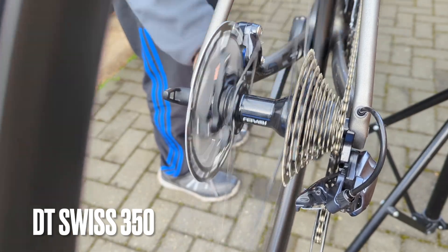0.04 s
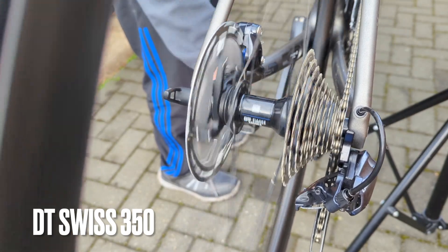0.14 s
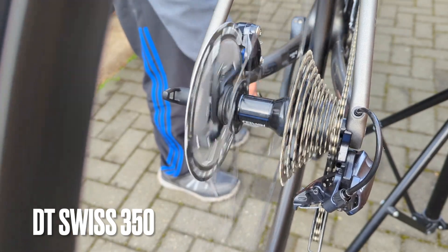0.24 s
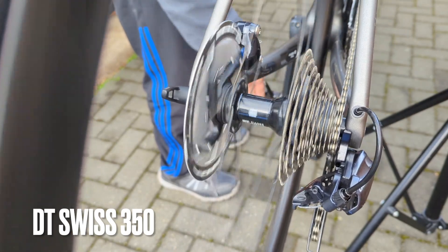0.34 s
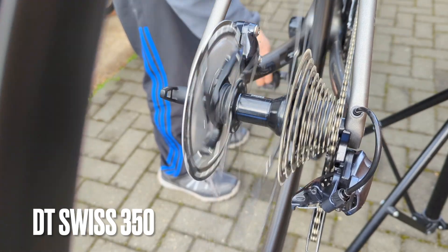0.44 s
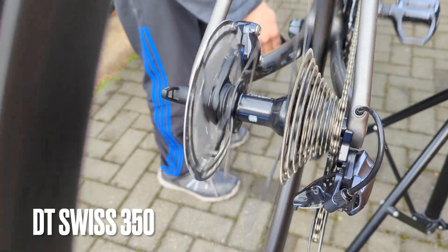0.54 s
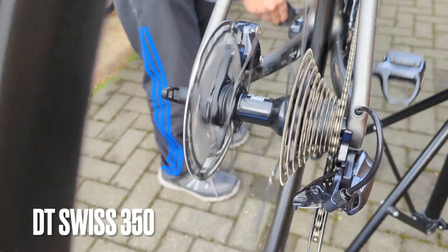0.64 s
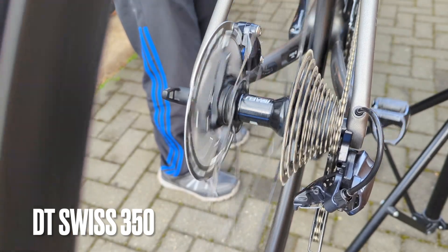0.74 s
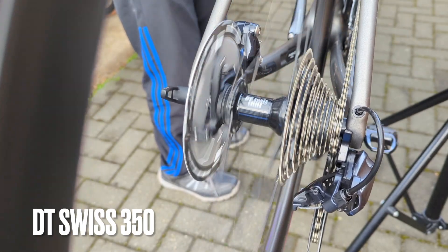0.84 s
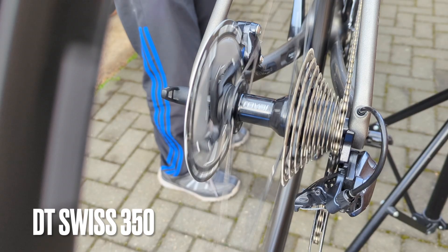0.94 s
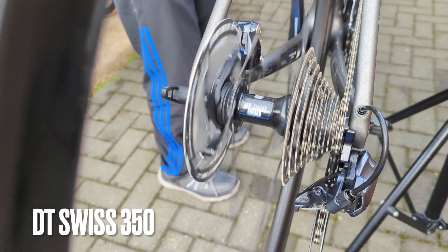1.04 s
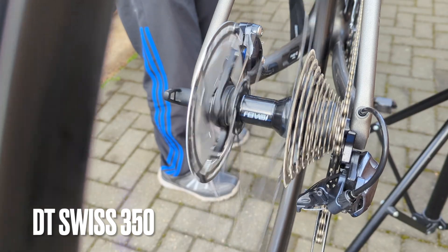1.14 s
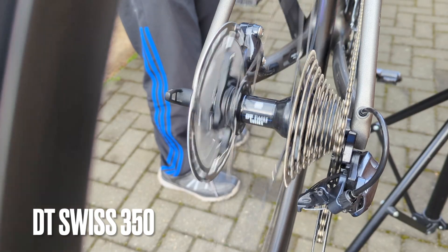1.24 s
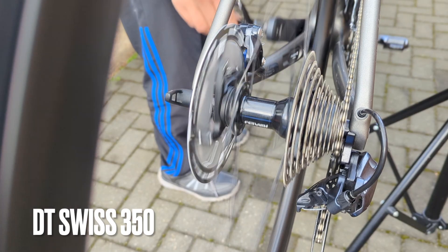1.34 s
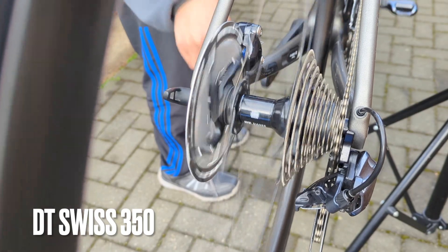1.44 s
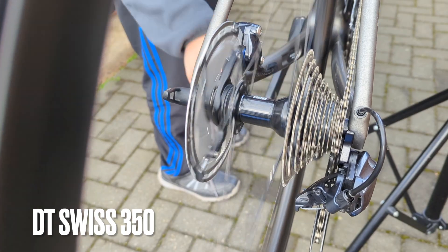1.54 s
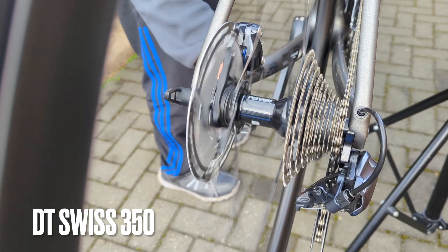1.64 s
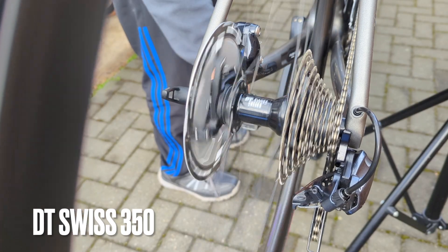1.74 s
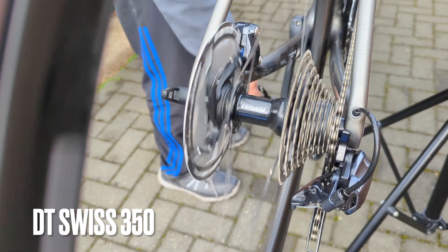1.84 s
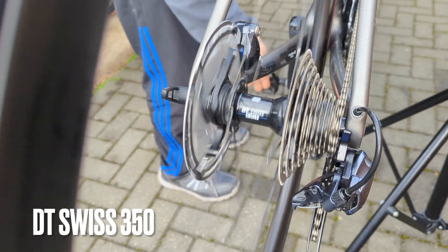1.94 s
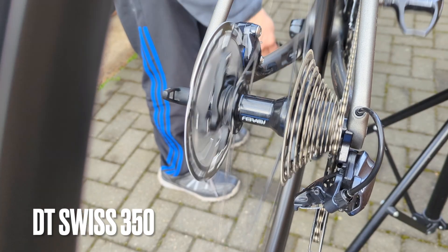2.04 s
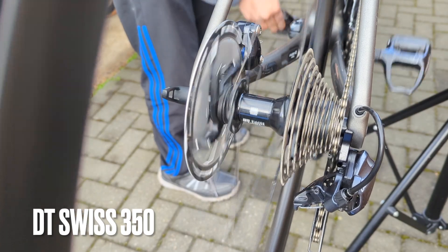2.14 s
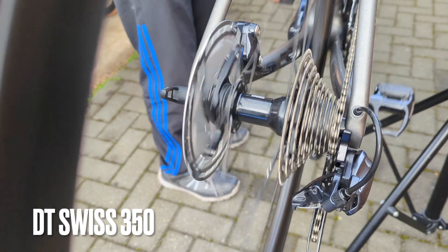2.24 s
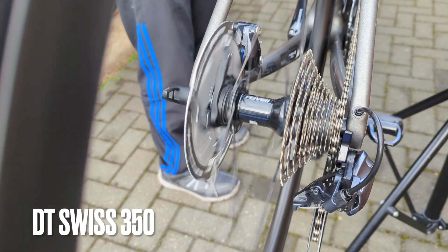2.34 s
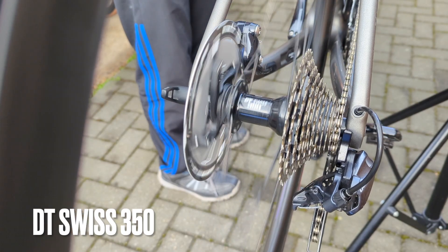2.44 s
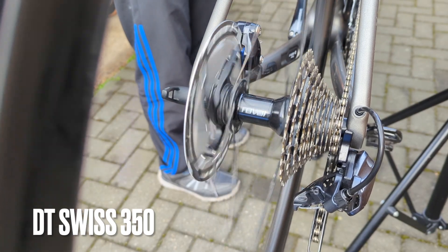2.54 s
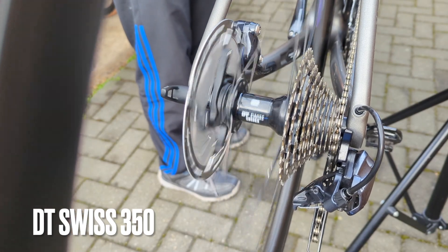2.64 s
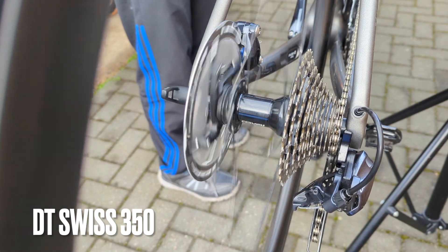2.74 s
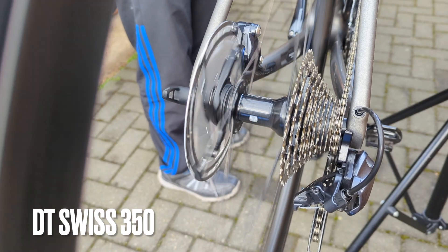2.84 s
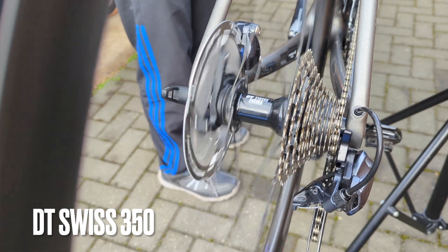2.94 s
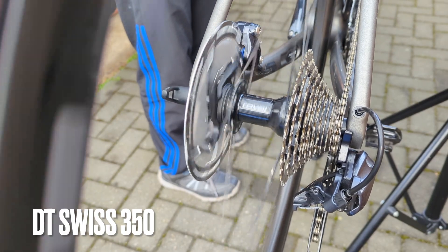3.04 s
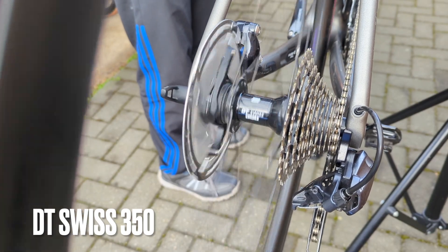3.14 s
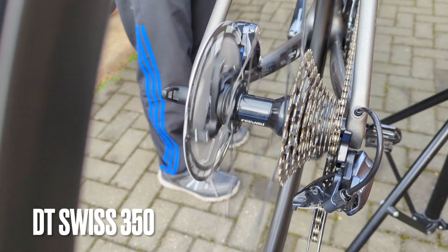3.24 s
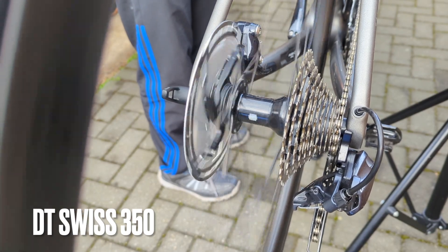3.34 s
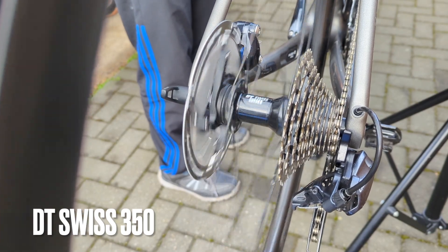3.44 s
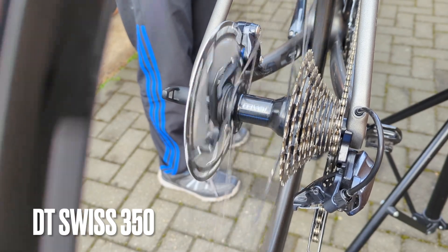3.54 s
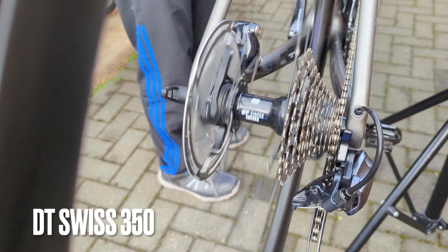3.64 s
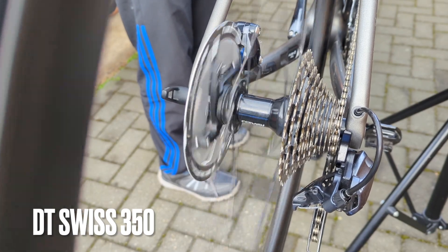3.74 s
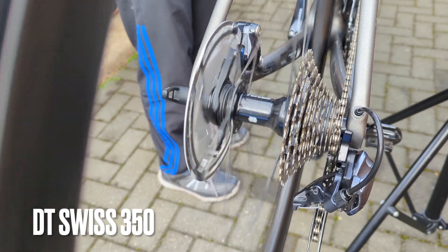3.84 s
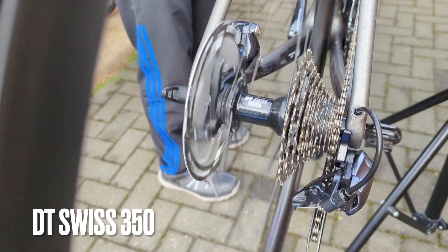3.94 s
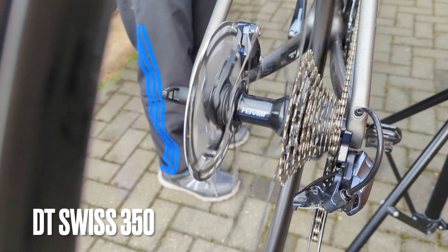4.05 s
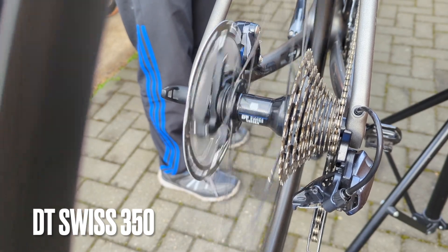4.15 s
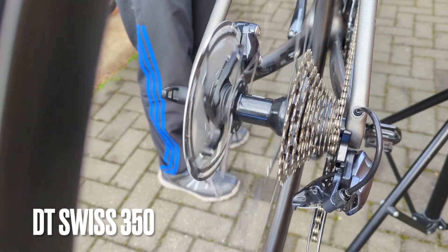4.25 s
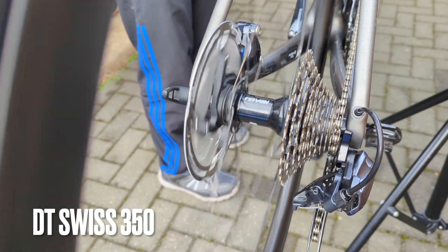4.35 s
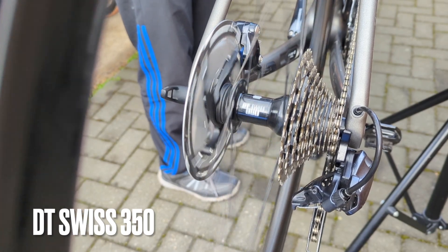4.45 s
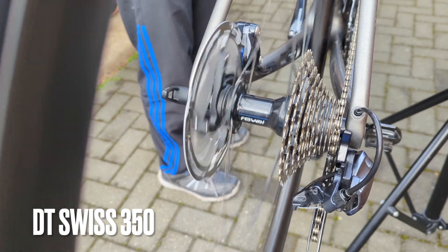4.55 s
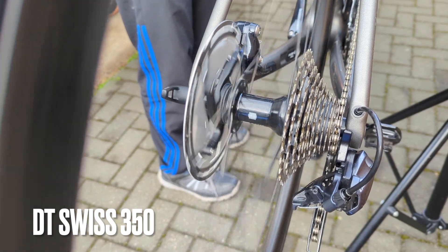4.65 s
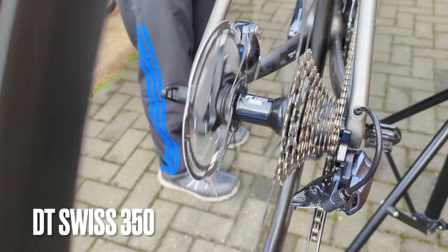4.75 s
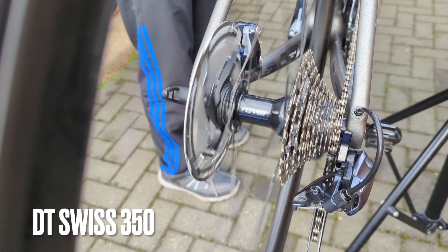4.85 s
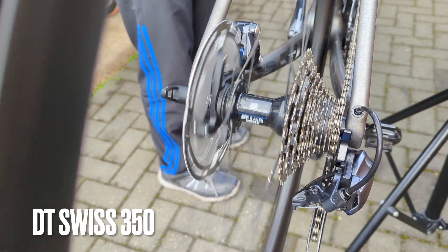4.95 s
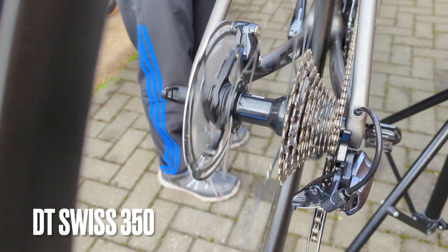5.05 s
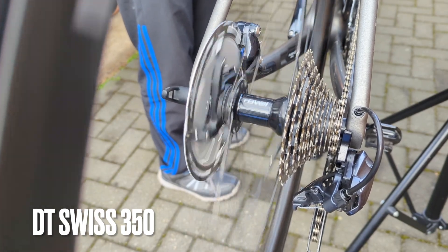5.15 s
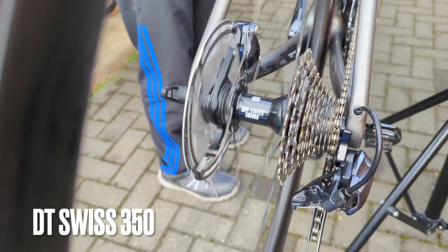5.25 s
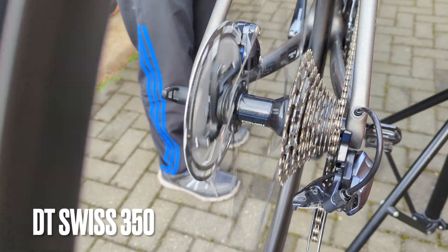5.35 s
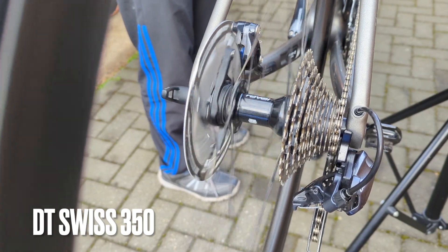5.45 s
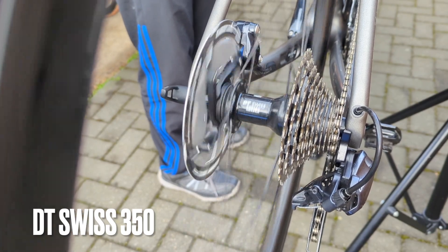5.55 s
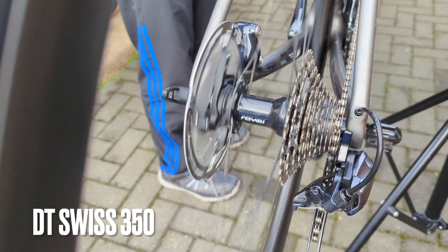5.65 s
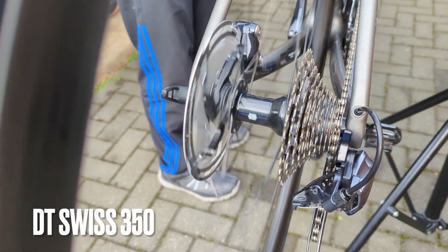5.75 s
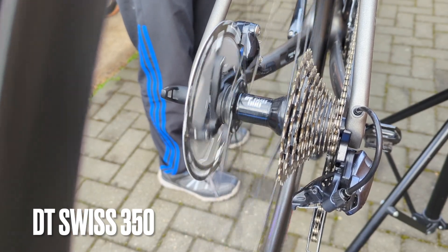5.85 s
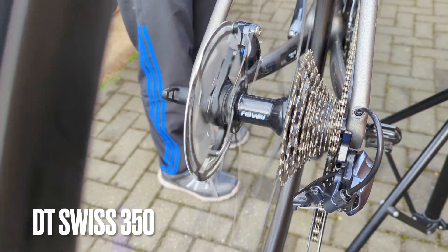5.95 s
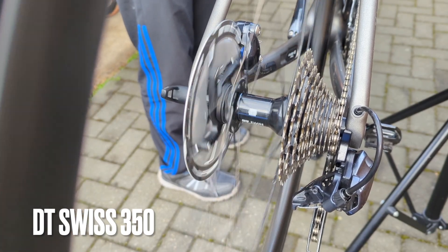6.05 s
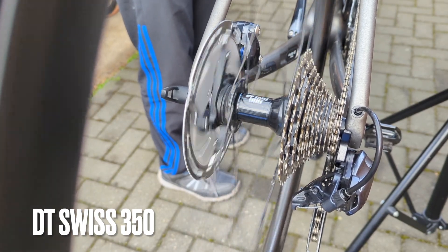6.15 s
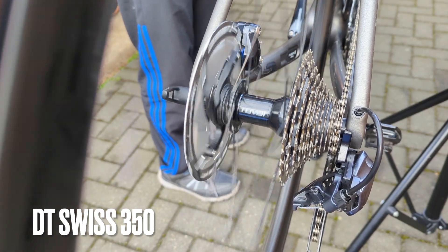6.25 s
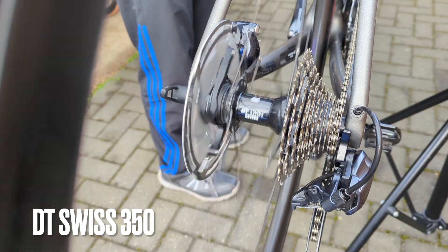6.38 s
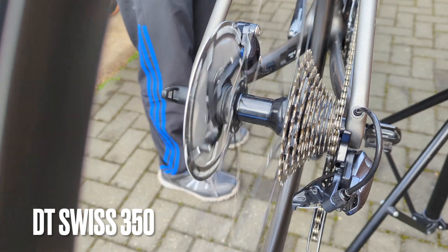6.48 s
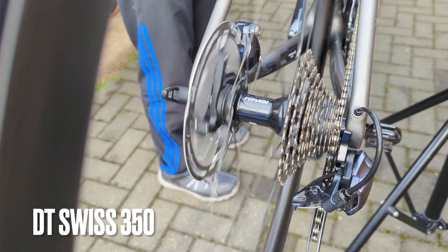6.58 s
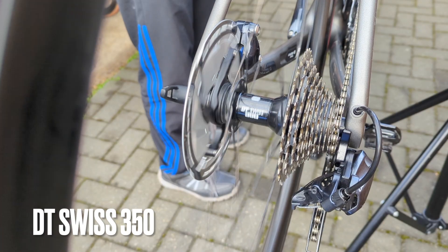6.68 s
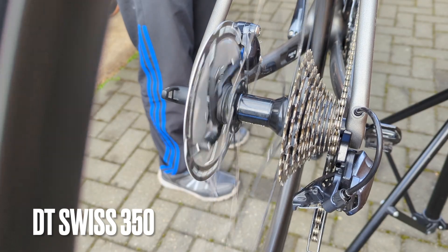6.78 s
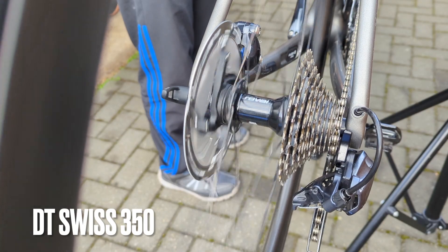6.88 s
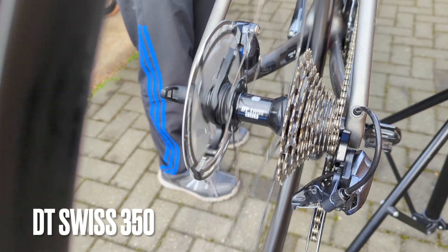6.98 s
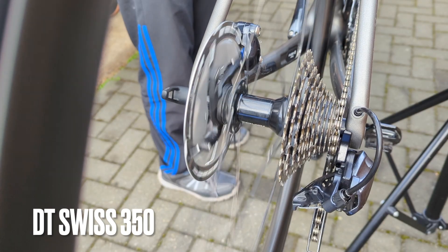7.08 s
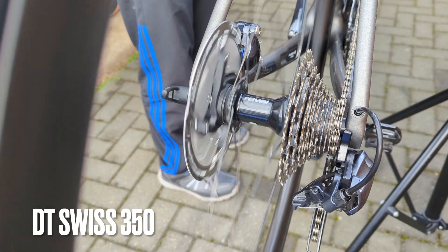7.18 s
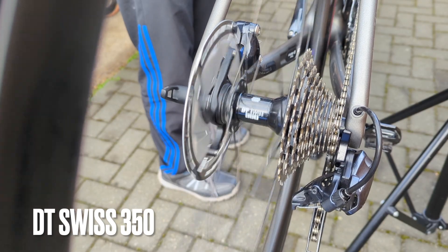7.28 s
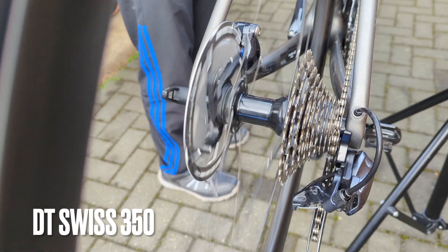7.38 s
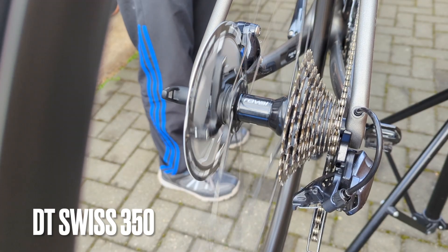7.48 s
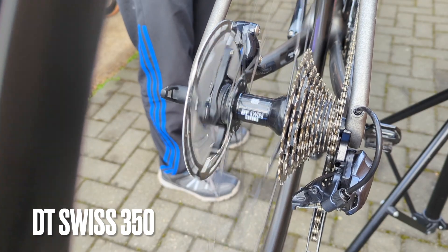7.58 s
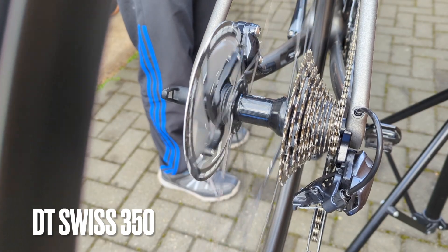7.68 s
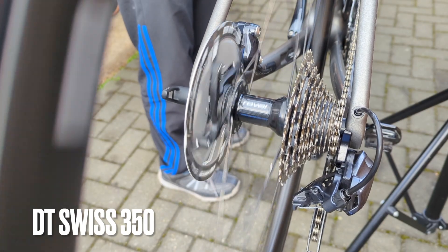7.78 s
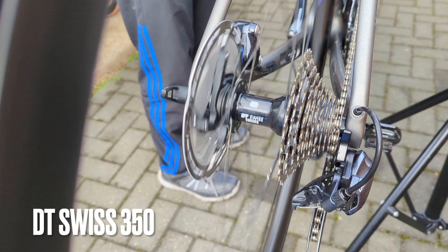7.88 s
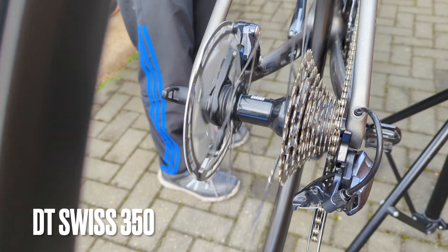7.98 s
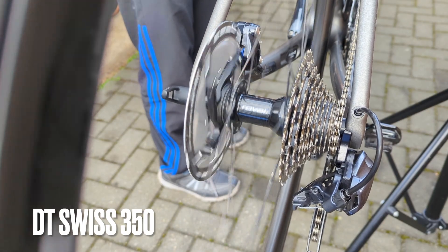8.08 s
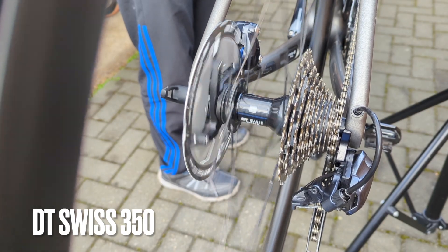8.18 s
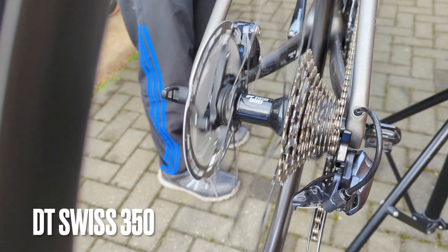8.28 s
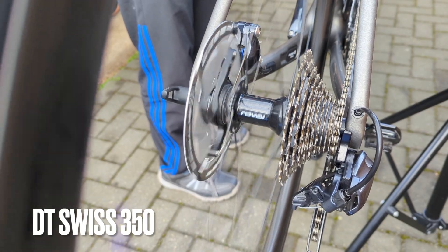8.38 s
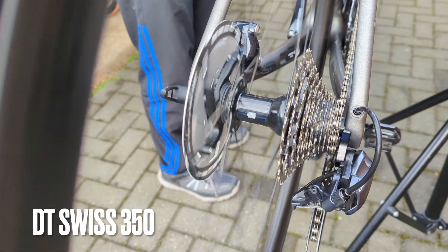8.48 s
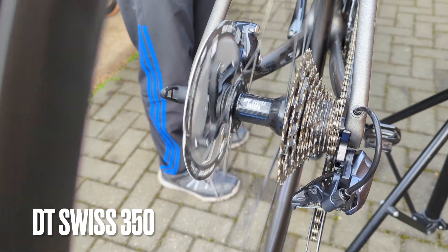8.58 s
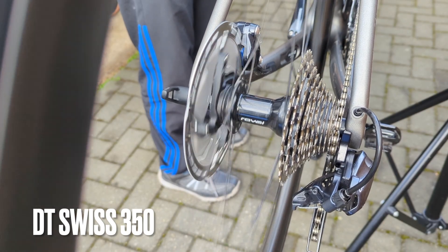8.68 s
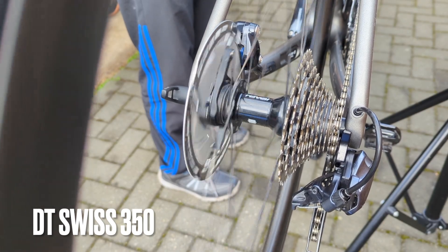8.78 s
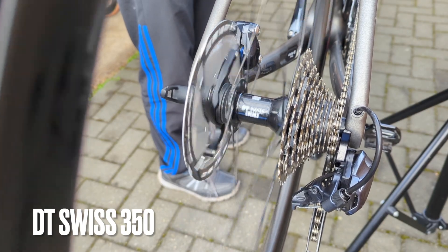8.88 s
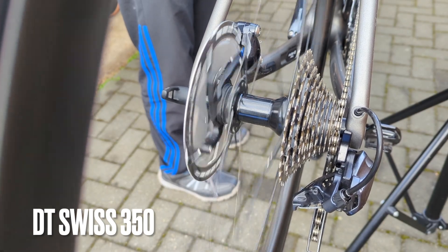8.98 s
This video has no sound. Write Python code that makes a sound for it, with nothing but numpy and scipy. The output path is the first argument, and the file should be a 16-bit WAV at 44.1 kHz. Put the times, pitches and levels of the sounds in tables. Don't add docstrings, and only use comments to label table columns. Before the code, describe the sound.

A bicycle rear wheel spins freely on a stand outdoors, very close to a stereo microphone. Its hub ratchet gives a dense, bright, ringing metallic buzz, wavering in pitch as a hand turns the cranks backwards. After about two and a half seconds the hand lets go, the buzz stumbles and drops, then slowly descends as the wheel coasts. Soft bumps, low wind puffs and a distant street wash sit far beneath.

```python
import sys
import numpy as np
from scipy import signal
from scipy.fft import rfft, irfft
from scipy.io import wavfile
from scipy.ndimage import uniform_filter1d

SR = 44100
rng = np.random.default_rng(int(sys.argv[2]) if len(sys.argv) > 2 else 0)


def wrap_up_sound(samples):
    columns = np.atleast_2d(samples).T
    tamed = np.clip(columns, -1, 1)
    steps = np.round(tamed * 32767).astype(np.int16)
    wavfile.write(sys.argv[1], SR, steps)


def nominal_scale(level):
    x = np.asarray(level, float) / 20
    return 10 ** x


N = 397782

TEETH, FIRST_TOOTH_S = 60, 2.8
RUNOUT = [(1, .0054, 1.7), (2, .0016, 1.5)]
# f/Hz, level/dB per Hz
WHEEL_COLOUR = [(150, -14), (450, 3), (1050, 3.5), (1300, 5.5), (1500, -2), (1900, 13.5), (3300, 15.5),
                (4400, 10.5), (6500, -73.5), (9000, -37.5), (11300, -41.5), (12000, -30.5), (15300, -34),
                (16500, -95)]
# f/Hz, width/Hz, left level/dB, right level/dB
WHEEL_MODES = [(689.3, 10, 18, 19), (1594, 84, 11.5, 15.5), (1907, 160, 14.5, 16), (2192, 48, 19.5, 13),
               (2504, 85, 20, -21), (2903, 132, 25, 27), (3477, 61, 12, 5.5), (4000, 83, 12, 22),
               (4546, 99, -26, 9.5), (4963, 147, -16.5, -5), (5789, 33, -47, -32.5), (6100, 19, -50, -54.5),
               (5900, 140, -51, -62), (8350, 85, -51, -33), (8797, 284, -37, -45), (10170, 630, -40, -44.5),
               (12300, 85, -22, -33.5), (12800, 150, -22, -28), (13900, 110, -27, -36)]
# f/Hz, level/dB
KNOCK_BAND = [(300, -11), (480, -6), (600, 3), (900, -4), (1150, 2), (5000, 1), (6300, -1), (9000, -25)]
RATTLE_BAND = [(1500, -85), (4300, -72), (5100, -36), (5800, -6), (6500, 0), (7500, 0), (9000, -20)]
SIZZLE_BAND = [(4500, -75), (6000, -30), (7500, -8), (8500, 0), (16000, 0)]
# f/Hz, level/dB per Hz
RUMBLE_COLOUR = [(25, -58), (50, -2.5), (100, 0.5), (160, -6), (250, -20), (500, -45)]
FLUTTER_COLOUR = [(100, -38), (190, -4.5), (300, -8), (450, -19), (800, -29)]
# t/s, peak level/dB, length/s, left over right/dB
BUMPS = [(0.027, -44, 0.21, -4), (0.87, -36, 0.032, -4), (0.943, -37, 0.042, 2), (1.22, -42, 0.12, -3),
         (3.114, -35, 0.028, -6), (3.19, -37.5, 0.075, 4), (3.42, -33, 0.026, -2), (3.478, -37, 0.068, -4),
         (3.534, -47, 0.039, 14), (5.923, -65, 0.045, 1.0), (7.155, -52, 0.048, -18)]
# f/Hz, level/dB per Hz
BUMP_COLOUR = [(150, -17), (300, -3.5), (450, 8.5), (650, -2), (1100, -6), (2000, -8.5)]
STREET_COLOUR = [(60, -12), (150, -3), (400, 0), (800, -6), (1200, -16), (3000, -34)]
STREET_DB = -62
COAST_S, COAST_PER_S, DRAG_PER_S2, EASING_PER_S3 = 2.7, 247.1, 12.504, .308
# t/s, extra teeth/(1/s)
HAND = [(0, 160), (.24, 141.5), (.4, 169), (.56, 204.6), (.64, 204), (1.12, 168), (1.2, 168), (1.28, 175.6),
        (1.36, 203), (1.68, 147), (1.84, 164.8), (1.92, 188.5), (2, 197), (2.24, 180.7), (2.28, 164.6),
        (2.48, 11), (2.56, 0)]
FULL_HAND_PER_S = 133
# coasting level/dB, gain when driven/dB, share of each jolt
COAST_DB = [-29.5, -20, -21]
DRIVEN_DB = [2.5, 3.5, 7]
JOLT_SHARE = [0.65, 0.9, 1.5]
# times a turn, level/dB, strongest tooth
KNOCK_RING = [(1, 2, 50.1), (4, 1.05, 6.2), (5, 3.7, 9.6)]
RATTLE_RING = [(1, 1.24, 48.4), (2, 2, 23.2), (3, 0.15, 7.1), (4, 0.88, 1.4), (5, 0.81, 0.32),
               (7, 0.54, 0.61), (8, 0.44, 8.9)]
SIZZLE_RING = [(1, 2.1, 35.5), (2, 2, 28), (3, 2.2, 20), (4, 0.24, 1.6), (5, 2.9, 8.4), (6, 2, 5.5),
               (7, 1.3, 1.9)]
SHOWN, SHOWN_PER_S, SHOWN_DRIVEN = 0.58, 0.054, 0.033
# t/s, level/dB, length/s
JOLTS = [
    (2.43, -5.5, 0.028),
    (2.5, -0.5, .012),
    (2.516, -1.5, 0.012),
    (2.582, 1, 0.013),
    (2.63, -2.5, 0.032),
]
# t/s, wander/us, length/s
JERKS = [
    (0, 45, .04),
    (.33, 45, .06),
    (.65, 42, .06),
    (.93, 85, .07),
    (1.37, 85, .06),
    (1.98, 95, .05),
    (2.41, 260, .09),
]
LOOSE_US, LOOSER_US_PER_S = 20, .8
# t/s, rumble level/dB, length/s, flutter over rumble/dB, left over right/dB
GUSTS = [(0.036, -41, 0.017, -5, 28), (1.884, -55, 0.09, -47, 47), (1.983, -49, 0.029, 1, 22),
         (2.122, -58, 0.02, -17, 16), (2.35, -67, 0.077, -10, 15), (2.75, -59, .025, -10, 4),
         (2.99, -60, 0.068, -23, -14), (3.446, -49.5, 0.023, 2, 14), (3.685, -47, 0.058, -9, 28),
         (3.909, -37.5, 0.025, 2, 45), (4.095, -60, 0.14, -17, 29), (4.5, -66, 0.12, -16, 26),
         (4.822, -55.5, .05, -16, 24), (5.486, -54, .025, -28, 22), (5.636, -47, 0.011, -20, 23),
         (5.782, -43, 0.016, -14, 30), (6.043, -40, 0.054, -1.5, 46), (6.321, -39.5, 0.03, -11, 36),
         (7.077, -51, 0.089, 1, -22), (7.298, -58, .12, -15, 12), (7.757, -58, 0.089, -30, 23),
         (8.3, -41.5, 0.013, -7, 32), (8.407, -44, 0.033, -8, 27), (8.865, -55.5, 0.048, -3, 25)]
CALM_DB, CALM_FLUTTER_DB = -68, -10
LEFT_DB, LEFT_DRIVEN_DB = .5, -0.1


def evened(x):
    return x / np.sqrt(np.mean(x ** 2) + 1e-20)


def read(points, hz):
    f, value = np.transpose(points)
    return np.interp(np.log(hz + 1), np.log(f + 1), value)


def swell(s, length):
    t = np.arange(0, N + 32, 32) / SR
    return np.exp(-.5 * ((t - s) / length) ** 2)


def fine(steps):
    return np.repeat(steps, 32, axis=-1)[..., :N]


def wander(steps, size):
    return evened(uniform_filter1d(uniform_filter1d(steps, size), size))


def split(pan_db):
    left = 1 / (1 + nominal_scale(-np.asarray(pan_db)) ** 2)
    return 2 * np.sqrt([left, 1 - left])


def air(colour, same, lumpy_db):
    a, b, *lumps = rng.standard_normal((4, N))
    lumps = evened(uniform_filter1d(uniform_filter1d(lumps, 900), 900))
    right = same * a + np.sqrt(1 - np.clip(same, 0, 1) ** 2) * b
    pair = np.array([a, right]) * nominal_scale(lumpy_db * lumps)
    gain = nominal_scale(read(colour, np.fft.rfftfreq(N, 1 / SR)))
    return evened(irfft(rfft(pair) * gain, N))


def causal(gain):
    size = len(gain) - 1
    log_gain = np.log(np.r_[gain, gain[-2:0:-1]])
    response = np.fft.ifft(np.exp(np.conj(signal.hilbert(log_gain)))).real
    return response[:size] * np.hanning(2 * size)[size:]


def wheel(band):
    hz = np.fft.rfftfreq(8192, 1 / SR)
    modes = 0
    for f, width, left_db, right_db in WHEEL_MODES:
        peak = nominal_scale([[left_db], [right_db]]) ** 2
        modes = modes + peak / (1 + (2 * (hz - f) / width) ** 2) ** 2.264
    gain = np.sqrt(nominal_scale(read(WHEEL_COLOUR, hz)) ** 2 + modes) * nominal_scale(read(band, hz))
    return np.array([causal(g) for g in gain])


def scattered(x, turn, t60, direct, flat, count):
    t = np.arange(2048) / SR
    low = signal.sosfiltfilt(signal.butter(4, 780, fs=SR, output="sos"), x)
    echoes = rng.standard_normal((count, 2, len(t))) * nominal_scale(-60 * t / t60)
    out = np.zeros((2, N))
    for k, paths in enumerate(rfft(echoes)):
        paths = irfft(paths / abs(paths) ** flat)
        paths /= np.linalg.norm(paths, axis=1, keepdims=True)
        away = ((turn * count - k + count / 2) % count) - count / 2
        facing = np.cos(np.pi / 2 * np.clip(away, -1, 1))
        out += signal.oaconvolve(((x - low) * facing)[None], paths, axes=1)[:, :N]
    return out + signal.oaconvolve(low[None], paths, axes=1)[:, :N] + direct * x


def rotation():
    t = np.arange(N) / SR
    hand = np.interp(t, *np.transpose(HAND))
    coast = t - COAST_S
    rate = COAST_PER_S - DRAG_PER_S2 * coast + EASING_PER_S3 * coast ** 2 + hand
    teeth = np.cumsum(rate) / SR
    teeth -= teeth[round(FIRST_TOOTH_S * SR)]
    spin = teeth / TEETH - np.cumsum(hand) / SR / TEETH
    driven = np.clip(hand / FULL_HAND_PER_S, 0, 1)
    return teeth, spin, driven


def pawl_strikes(teeth):
    turn, t = teeth / TEETH, np.arange(N) / SR
    jerks = fine(sum(us * swell(s, length) for s, us, length in JERKS))
    loose_us = LOOSE_US + LOOSER_US_PER_S * t + jerks
    teeth = teeth + sum(share * TEETH / (2 * np.pi * n) * np.sin(2 * np.pi * n * turn + phase)
                        for n, share, phase in RUNOUT)
    tooth = np.arange(np.ceil(teeth[0]), teeth[-1])
    early, size, chatter_size = rng.standard_normal((len(tooth), 3)).T
    at = np.interp(tooth, teeth, np.arange(N))
    off_beat = .75 * wander(early, size=5) + .04 * early
    at = at + SR * 1e-6 * loose_us[at.astype(int)] * off_beat
    whole = np.clip(at.astype(int), 0, N - 2)
    knocks, bursts = np.zeros((2, N))
    blow = nominal_scale(1.3 * wander(size, size=5) + .05 * size)
    knocks[whole] = blow * (1 - at % 1)
    knocks[whole + 1] = blow * (at % 1)
    bursts[whole] = nominal_scale(2.9 * chatter_size)
    fade = np.exp(-1 / (0.0012 * SR))
    chatter = evened(signal.lfilter([1], [1, -fade], bursts)) + .95
    return knocks, chatter


def freehub():
    teeth, spin, driven = rotation()
    coast = np.arange(N) / SR - COAST_S
    shown = (1 - driven) * (SHOWN + SHOWN_PER_S * coast) + driven * SHOWN_DRIVEN

    def around(ring):
        return nominal_scale(shown * sum(db * np.cos(2 * np.pi * n * (teeth - top) / TEETH) for n, db, top in ring))

    jolt_db = fine(sum(db * swell(s, length) for s, db, length in JOLTS))
    knocks, chatter = pawl_strikes(teeth)
    knock = knocks * around(KNOCK_RING)
    rattle = chatter * rng.standard_normal(N) * around(RATTLE_RING)
    sizzle = chatter * rng.standard_normal(N) * around(SIZZLE_RING)
    layers = [(scattered(knock, spin, t60=0.036, direct=0.12, flat=1.0, count=8), KNOCK_BAND),
              (scattered(rattle, spin, t60=0.047, direct=0.075, flat=0.94, count=4), RATTLE_BAND),
              (scattered(sizzle, spin, t60=.004, direct=.1, flat=1, count=5), SIZZLE_BAND)]
    out = np.zeros((2, N))
    for k, (x, band) in enumerate(layers):
        sound = signal.oaconvolve(x, wheel(band), axes=1)[:, :N]
        steady = np.sqrt(uniform_filter1d((sound ** 2).mean(0), SR // 2) + 1e-12)
        level_db = COAST_DB[k] + DRIVEN_DB[k] * driven + JOLT_SHARE[k] * jolt_db
        out += nominal_scale(level_db) * sound / steady
    return out * nominal_scale(np.outer([.5, -.5], LEFT_DB + LEFT_DRIVEN_DB * driven))


def yard():
    t, bumps = np.arange(0, N + 32, 32) / SR, 0
    for s, peak_db, length, pan_db in BUMPS:
        u = np.maximum(t - s + 0.021, 0) / (0.5 * length)
        bump = u * np.exp(1 - u)
        bumps = bumps + nominal_scale(peak_db - 4.0) * split(pan_db)[:, None] * bump
    street = nominal_scale(STREET_DB) * air(STREET_COLOUR, same=1.0, lumpy_db=-2.0)
    return fine(bumps) * air(BUMP_COLOUR, same=0.43, lumpy_db=2.5) + street


def wind():
    rumble, flutter = nominal_scale(CALM_DB), nominal_scale(CALM_DB + CALM_FLUTTER_DB)
    for s, rumble_db, length, flutter_db, pan_db in GUSTS:
        gust = nominal_scale(rumble_db) * split(pan_db)[:, None] * swell(s, length)
        rumble = rumble + gust
        flutter = flutter + nominal_scale(flutter_db) * gust
    low = fine(rumble) * air(RUMBLE_COLOUR, same=0.13, lumpy_db=4)
    return low + fine(flutter) * air(FLUTTER_COLOUR, same=0.3, lumpy_db=4.5)


def scene():
    return freehub() + yard() + wind()


def darken_gaps(x):
    hz, _, z = signal.stft(x, SR, nperseg=2048, noverlap=1536)
    near = uniform_filter1d(abs(z) ** 2, size=3, axis=1)
    near = uniform_filter1d(near, size=3, axis=2) + 1e-16
    under_db = 10 * np.log10(uniform_filter1d(near, size=29, axis=1) / near)
    in_range = (hz > 750) & (hz < 5600)
    cut_db = np.clip(1.3 * (under_db - 7), 0, 24) * in_range[:, None]
    return signal.istft(z / nominal_scale(cut_db), SR, nperseg=2048, noverlap=1536)[1][:, :N]


def low_pass(x):
    return signal.sosfilt(signal.butter(12, 16510, fs=SR, output="sos"), x)


def record(dry):
    mix = np.clip(darken_gaps(dry), -1, 1)
    return low_pass(mix)


dry = scene()
out = record(dry)
wrap_up_sound(out)
```